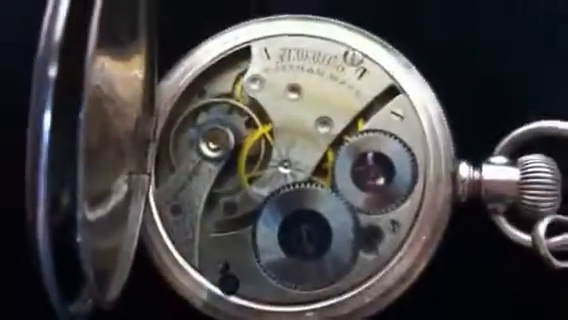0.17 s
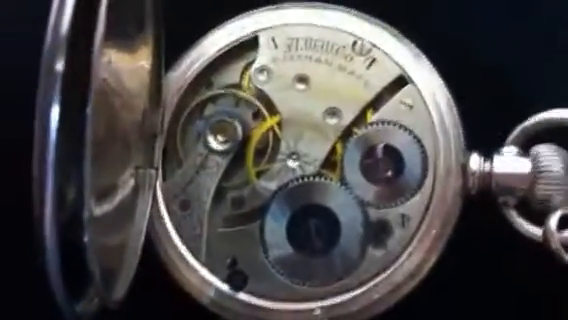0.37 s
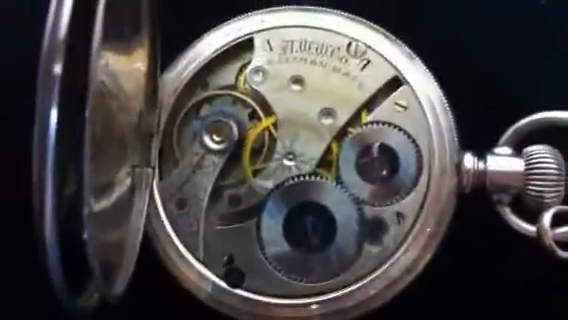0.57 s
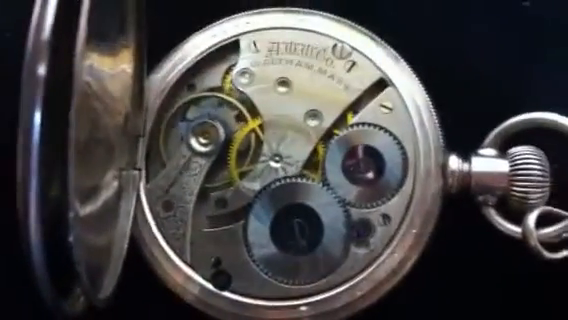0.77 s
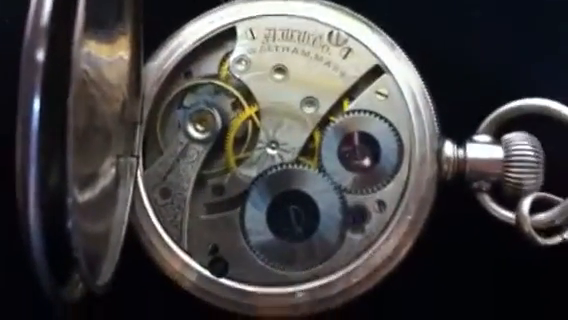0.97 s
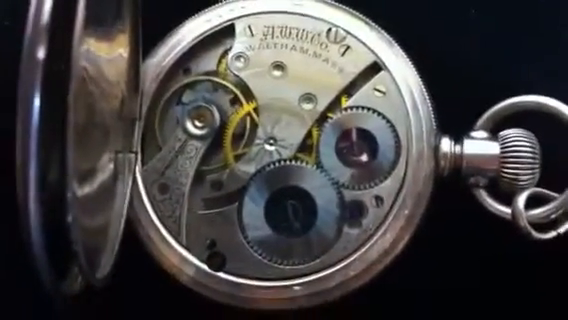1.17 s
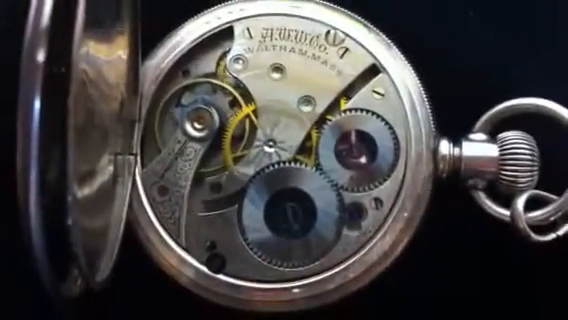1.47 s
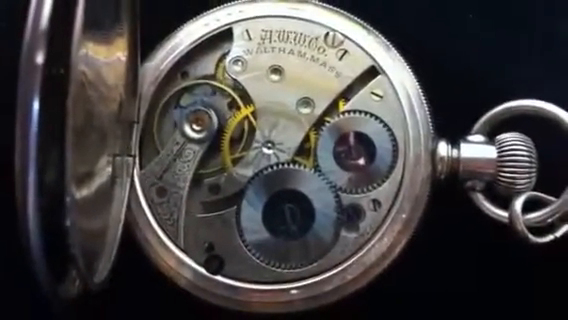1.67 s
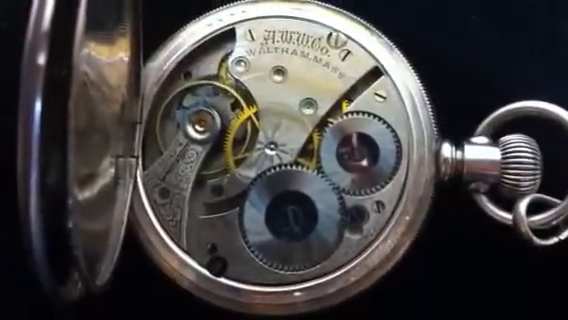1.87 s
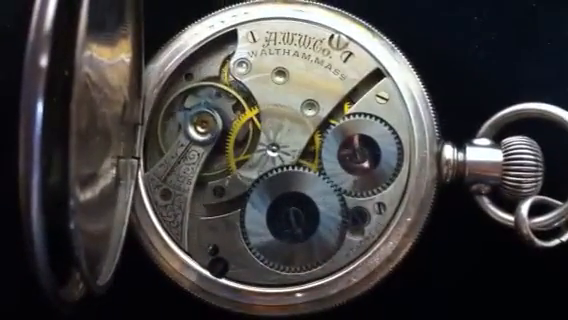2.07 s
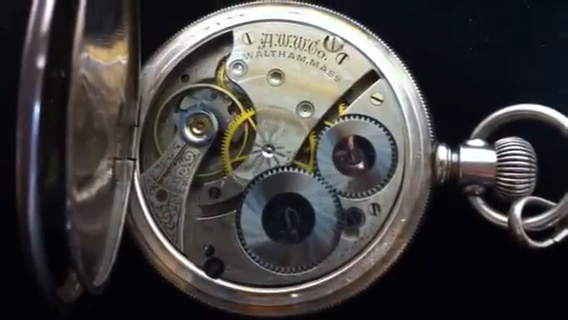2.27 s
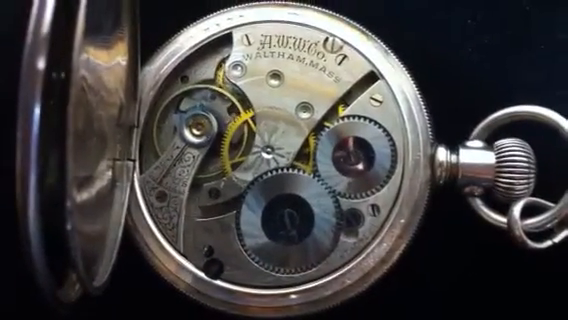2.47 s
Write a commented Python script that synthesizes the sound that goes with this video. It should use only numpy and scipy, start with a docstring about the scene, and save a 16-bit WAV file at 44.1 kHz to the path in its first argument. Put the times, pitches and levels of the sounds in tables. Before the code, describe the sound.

Pocket watch ticking close up, five crisp bright metallic ticks a second over faint quiet room rumble

```python
"""Open pocket watch, close, quiet room

The watch ticks five times a second close to the microphone. In each beat the lever unlocks, pushes the
balance, and the escape wheel drops onto a pallet: bright noise cracks and decaying modes of the movement.
The two pallets alternate as tick and tock; a spring rings on thinly around some tocks. Behind the watch
are filtered-noise rumble, rustle and hiss, a motor's hum of wavering sines, and one brief faint tone."""
import sys
import numpy as np
from scipy import signal
from scipy.fft import rfft, irfft, next_fast_len
from scipy.io import wavfile
from scipy.ndimage import uniform_filter1d, map_coordinates

SR = 44100
rng = np.random.default_rng(int(sys.argv[2]) if len(sys.argv) > 2 else 0)


def put_to_file(sound):
    """Save the sound as 16-bit audio at rate SR, in the file named by the first command-line argument."""
    columns = np.atleast_2d(sound).T  # one column per channel
    safe = np.clip(columns, -1, 1)
    whole_steps = np.round(safe * 32767)
    wavfile.write(sys.argv[1], SR, whole_steps.astype(np.int16))


N = 115983

# Low rumble that comes and goes: its course (t/s, level/dB before the trim) and colour (f/Hz, level/dB per Hz)
LOW_RUMBLE_COURSE = [(0, -53), (.08, -58), (.14, -52), (.32, -58), (.38, -51), (.43, -54), (.53, -45),
                     (.6, -56), (.67, -49.5), (.84, -57), (.91, -48.5), (1.08, -57), (1.4, -59),
                     (1.66, -52.5), (1.8, -58), (2.1, -56), (2.21, -52), (2.4, -57), (2.56, -48),
                     (2.63, -55)]
LOW_RUMBLE_COLOUR = [(25, -44), (60, -26.5), (95, -21), (112, 0), (124, 10), (148, 2), (175, -9),
                     (230, -30), (500, -100)]
LOW_RUMBLE_TRIM_DB = .5

# Steadier room rumble, colour only (f/Hz, relative level/dB per Hz)
ROOM_RUMBLE_COLOUR = [(25, -56), (70, -24), (120, -6), (160, 0), (200, -2), (270, -7), (400, -10.5),
                      (600, -19), (770, -19), (950, -29), (1500, -34), (4000, -100)]
ROOM_RUMBLE_DB, SWELL_DB, SWELLS_PER_S = -54, .7, 6

# Faint, uneven midrange noise of the room, colour only (f/Hz, relative level/dB per Hz)
RUSTLE_COLOUR = [(700, -58), (1300, -7), (1950, 9), (2600, -10), (3200, 3.5), (4000, -16), (7000, -64)]
RUSTLE_DB, RUSTLE_WAVER_DB = -79.5, 8.5

# Even hiss, and a narrow band of it that wavers, colour only (f/Hz, relative level/dB per Hz)
HISS_COLOUR = [(300, 0), (1200, 1), (1500, -.5), (1950, 1), (2600, -2), (3200, -1), (4000, -4), (6700, -6),
               (9000, -3.5), (10500, -6), (14500, -8), (15650, -8.5), (16100, -45), (16500, -80)]
SHIMMER_COLOUR = [(6000, -29), (8000, -21), (9000, -1), (9800, -21), (13000, -81)]
HISS_DB, SHIMMER_DB, SHIMMER_WAVER_DB = -64.5, -79, 2.5

# Hum of a motor in the room (f/Hz, rms level/dB)
HUM_TONES = [(124, -64), (180, -63), (235.3, -68), (293.8, -64), (352.3, -70), (529, -73.5), (701, -68.5),
             (720, -73), (738.3, -73.5), (774, -81.5), (1253, -84)]
HUM_WAVER_DB, HUM_DRIFT_RAD = 2.5, 0.62

# Beats, tick and tock in turn (t/s of the drop, level/dB of the drop before its tint, level/dB of the impulse
# contact, then the tint: extra level/dB below 6 kHz, around 9 kHz, around 13 kHz, above 15 kHz)
BEAT_LIST = [(.1177, -38, -49, 2.5, 1, 1.5, 1), (.3181, -36.5, -64, 0.5, -2, -3.5, -2),
             (.519, -38, -47.5, -1.5, 2.5, -5.5, 0), (.7187, -35.5, -44, -3.5, -3.5, -4.5, -3),
             (.9193, -39.5, -63, 4, 0, 4, 1), (1.1198, -40, -49, 1.5, 1, 1, -2),
             (1.3203, -33.5, -58, -4, -3.5, -3, -3), (1.5206, -39, -61, 1, -1.5, -5, -1),
             (1.7212, -40, -43, 2, -0.5, 4.5, 3), (1.9213, -44.5, -50, 3.5, 5.5, 2, 8),
             (2.122, -35.5, -46, -3, -3, -5.5, 3), (2.3222, -41, -66, 7, 3.5, 7.5, 3),
             (2.5225, -37.5, -44, 1.5, -2.5, 0, 1)]
# Corners of the tint (f/Hz)
TINT_EDGES_HZ = [6000, 6800, 7800, 8200, 9800, 11500, 14000, 15000]
RADIATES_ABOVE_HZ = 4050  # the small movement radiates little below this

# Light contacts ahead of the drop, a row for a tick and one for a tock
# (lead t/s of unlocking, of the impulse, of the tooth sliding off)
CONTACT_LEADS = [(.015, .0081, .0024), (.0135, .0072, .0032)]
UNLOCK_DB, SLIDE_DB = -52, (-48, -44.5)  # slide: on a tick, on a tock
SCRAPE_RISE_S, SCRAPE_T60_S, LEAD_RING_DB = .001, .013, -8

# Modes of the lever (f/Hz, level/dB, t60/s)
LEVER_RING = [(7450, -6, .02), (9900, -6, .016), (14850, -4, .014)]
# Modes of the plates and case (f/Hz, relative level/dB on a tick, the same on a tock, t60/s)
MOVEMENT_MODES = [(5540, -17, -18, .014), (5880, -23, -20, .022), (7030, -11, -16, .034),
                  (7530, -.5, 2, .02), (8245, -1, -7, .035), (8620, -10, -4, .02), (9450, -12, -13, .02),
                  (9690, -9, -9, .034), (11330, -12, -17, .022), (12170, -5, -15, .013),
                  (12365, 0, -3, .023), (12710, -8, -7, .016), (13430, -5, -10, .015),
                  (13880, -4.5, -7.5, .022), (14530, -13, -11, .028), (15290, -8, -3, .032)]
# Random change at each ringing: spread of each mode's level, and of its pitch as a share
MODE_SCATTER_DB, MODE_DETUNE = 2.5, .0045

# Colour of metal on jewel (f/Hz, relative level/dB per Hz)
CRACK_COLOUR = [(1000, -49), (3500, -22), (5500, -13), (6500, -21), (7500, -2), (9500, -3.5), (10800, -7.5),
                (13000, 3), (15500, -8), (16600, -46)]
CRACK_DB, CRACK_T60_S = -1.5, .008

# Knocks of the drop and its rebounds (delay t/s before scatter, level/dB on a tick, level/dB on a tock)
KNOCKS = [(0, 1, 1), (.0012, -3, -2), (.0024, 0, -1), (.0048, -7, -.5)]
REBOUND_RING_DB, REBOUND_SCATTER = -11, .2  # scatter is a share of the delay
RISE_S, HOLD_S = .00014, .0005  # attack of the drop, and how long the modes stay at full level

# A spring ringing on thinly (t/s, f/Hz, starting peak level/dB, t60/s)
SPRING_RINGS = [(.3182, 15020, -66, .25), (.7188, 15020, -59, .15), (1.1198, 15020, -63, .2),
                (1.908, 5950, -63, .3), (2.3222, 15020, -59, .15)]
SPRING_FLUTTER_RAD, SPRING_FLUTTERS_PER_S = .8, 250

ROOM_DB, ROOM_T60_S = -28, 0.72

# A faint, brief tone in the room: centre, pitch, peak level, spread
WHINE_S, WHINE_HZ, WHINE_DB, WHINE_WIDTH_S = 1.08, 1240, -66, .028

TOP_HZ = 16400  # upper band limit of the sound


def amp(db):
    """Decibels to gain."""
    return 10 ** (np.asarray(db) / 20)


def unit(x):
    """Scales to rms 1."""
    return x / np.sqrt(np.mean(x ** 2) + 1e-20)


def wobble(rate):
    """A smooth random curve with rate knots a second."""
    knots = rng.standard_normal(200)
    return map_coordinates(knots, [np.arange(N) * rate / SR], mode="mirror")


def noise(colour):
    """Gaussian noise of rms 1, filtered to a colour joined up over log frequency."""
    size = next_fast_len(N + SR // 4)
    hz, db = np.transpose(colour)
    log_hz = np.log(np.fft.rfftfreq(size, 1 / SR) + 1)
    gain = amp(np.interp(log_hz, np.log(hz), db))
    return unit(irfft(rfft(rng.standard_normal(size)) * gain, size)[:N])


def evened(x):
    """Noise with its chance swells levelled out over a sixth of a second."""
    power = np.abs(uniform_filter1d(x ** 2, size=SR // 6))
    return x / np.sqrt(power + 1e-20)


def decay(t, t60):
    """Exponential fall of 60 dB in t60."""
    return np.exp(-np.log(1000) * t / t60)


def fade_in(x, rise_s):
    """Softens the start of a contact."""
    return x * (1 - np.exp(-np.arange(len(x)) / SR / rise_s))


def add(track, s, sound):
    """Mixes a sound into the track at time s."""
    part = track[max(0, round(s * SR)):][:len(sound)]
    part += sound[:len(part)]


def low_rumble():
    """Evened low noise whose level follows its course."""
    level_db = np.interp(np.arange(N) / SR, *np.transpose(LOW_RUMBLE_COURSE))
    return amp(LOW_RUMBLE_TRIM_DB + level_db) * evened(noise(LOW_RUMBLE_COLOUR))


def room_rumble():
    """Steadier low noise of the room, swelling slightly."""
    swell = amp(SWELL_DB * wobble(SWELLS_PER_S))
    return amp(ROOM_RUMBLE_DB) * unit(noise(ROOM_RUMBLE_COLOUR) * swell)


def rustle():
    """Midrange noise that comes and goes unevenly."""
    waver = amp(RUSTLE_WAVER_DB * wobble(13.81))
    return amp(RUSTLE_DB) * unit(noise(RUSTLE_COLOUR) * waver)


def hiss():
    """Steady broadband noise plus a narrow band that wavers."""
    even = amp(HISS_DB) * noise(HISS_COLOUR)
    waver = amp(SHIMMER_WAVER_DB * wobble(24.0))
    return even + amp(SHIMMER_DB) * unit(noise(SHIMMER_COLOUR) * waver)


def motor_hum():
    """Sines at the motor's tones, each wavering in level and drifting in phase."""
    t, hum = np.arange(N) / SR, np.zeros(N)
    for hz, db in HUM_TONES:
        waver = amp(HUM_WAVER_DB * wobble(12))
        phase = 2 * np.pi * (hz * t + rng.random()) + HUM_DRIFT_RAD * wobble(6.135)
        hum += amp(db) * unit(waver * np.sin(phase))
    return hum


def crack(grit, t60):
    """Steel meets jewel: a random piece of bright noise, dying within milliseconds."""
    t = np.arange(SR // 12) / SR
    return grit[rng.integers(N - len(t)):][:len(t)] * decay(t, t60)


def movement_ring(pallet):
    """The movement's modes, fed briefly by the contact and then dying."""
    t = np.arange(SR // 12) / SR
    hz, tick_db, tock_db, t60 = np.transpose(MOVEMENT_MODES)
    mode_db = (tick_db, tock_db)[pallet]
    gain = amp(mode_db + MODE_SCATTER_DB * rng.standard_normal(len(hz)))
    hz = hz * (1 + MODE_DETUNE * rng.standard_normal(len(hz)))
    phase = 2 * np.pi * (hz[:, None] * t + rng.random((len(hz), 1)))
    envelope = decay(np.maximum(t - HOLD_S, 0), t60[:, None])
    return gain @ (np.sin(phase) * envelope) * np.sqrt(2) / np.linalg.norm(gain)


def lever_ring():
    """The lever's modes as decaying sines."""
    t = np.arange(SR // 12) / SR
    return sum(amp(db) * np.sin(2 * np.pi * (hz * t + rng.random())) * decay(t, t60)
               for hz, db, t60 in LEVER_RING)


def light_contact(pallet, grit):
    """A short scrape that rings the lever and, more weakly, the movement."""
    scrape = crack(grit, SCRAPE_T60_S)
    movement = amp(LEAD_RING_DB) * movement_ring(pallet)
    return fade_in(scrape + lever_ring() + movement, SCRAPE_RISE_S)


def tinted(x, low_db, mid_db, treble_db, top_db):
    """Gives a drop its own brightness and removes the lows that so small a body cannot radiate."""
    size = 2 * len(x)
    edge_db = [low_db, 0, 0, mid_db, mid_db, treble_db, treble_db, top_db]
    tint = amp(np.interp(np.fft.rfftfreq(size, 1 / SR), TINT_EDGES_HZ, edge_db))
    coloured = irfft(rfft(x, size) * tint)[:len(x)]
    high_pass = signal.butter(N=2, Wn=RADIATES_ABOVE_HZ, btype="high", fs=SR, output="sos")
    return signal.sosfilt(high_pass, coloured)


def wheel_drop(pallet, grit, tint_db):
    """The escape wheel lands on a pallet and rebounds; each knock cracks and rings the movement."""
    drop = movement_ring(pallet)
    for delay_s, *knock_db in KNOCKS:
        knock = amp(CRACK_DB) * crack(grit, CRACK_T60_S)
        knock += amp(REBOUND_RING_DB) * movement_ring(pallet)
        scattered_s = delay_s * (1 + REBOUND_SCATTER * rng.standard_normal())
        add(drop, scattered_s, amp(knock_db[pallet]) * fade_in(knock, RISE_S))
    opening_level = np.std(drop[:SR // 110])  # first 9 ms
    return tinted(fade_in(drop, RISE_S), *tint_db) / opening_level


def spring_ring(hz, t60):
    """A thin decaying sine with a fast random flutter of phase."""
    t = np.arange(SR // 3) / SR
    flutter = SPRING_FLUTTER_RAD * wobble(SPRING_FLUTTERS_PER_S)[:len(t)]
    return np.sin(2 * np.pi * hz * t + flutter) * decay(t, t60)


def escapement():
    """Each beat: three light contacts, then the louder drop; a spring rings around some tocks."""
    out, grit = np.zeros(N), noise(CRACK_COLOUR)
    for k, (s, drop_db, impulse_db, *tint_db) in enumerate(BEAT_LIST):
        pallet = k % 2  # 0 tick, 1 tock
        contact_db = (UNLOCK_DB, impulse_db, SLIDE_DB[pallet])
        for lead_s, db in zip(CONTACT_LEADS[pallet], contact_db):
            add(out, s - lead_s, amp(db) * light_contact(pallet, grit))
        add(out, s, amp(drop_db) * wheel_drop(pallet, grit, tint_db))
    for s, hz, db, t60 in SPRING_RINGS:
        add(out, s, amp(db) * spring_ring(hz, t60))
    return out


def room(x):
    """The room's weak diffuse tail: convolution with decaying noise of unit energy."""
    t = np.arange(SR // 2) / SR
    tail = rng.standard_normal(len(t)) * decay(t, ROOM_T60_S)
    return amp(ROOM_DB) * signal.fftconvolve(x, tail / np.linalg.norm(tail))[:N]


def whine():
    """One faint sine under a brief bell-shaped envelope."""
    t = np.arange(N) / SR
    envelope = np.exp(-((t - WHINE_S) / WHINE_WIDTH_S) ** 2 / 2)
    return amp(WHINE_DB) * envelope * np.sin(2 * np.pi * WHINE_HZ * t)


def scene():
    """The watch close to the microphone, the room behind it."""
    background = low_rumble() + room_rumble() + rustle() + hiss() + motor_hum()
    watch = escapement()
    return (background + watch + room(watch) + whine())[None]


def band_limited(x):
    """Removes everything above the band limit."""
    size = next_fast_len(N + SR // 4)
    in_band = np.fft.rfftfreq(size, 1 / SR) < TOP_HZ
    return irfft(rfft(x, size) * in_band, size)[:, :N]


def record(dry):
    """The finished sound: the scene, band-limited."""
    return band_limited(dry)


dry = scene()
out = record(dry)
put_to_file(out)
```